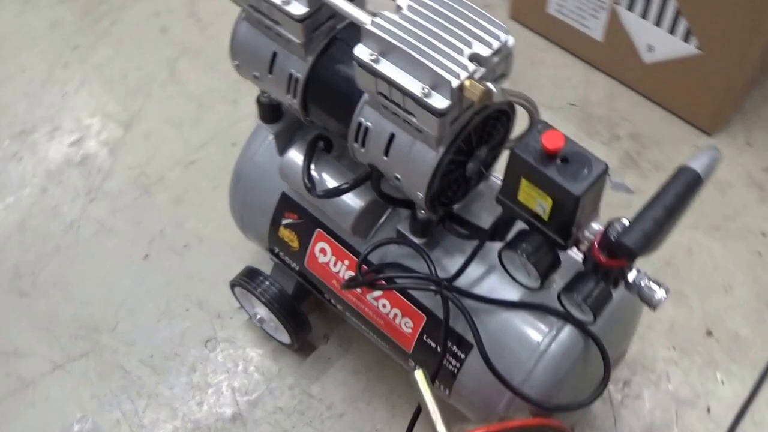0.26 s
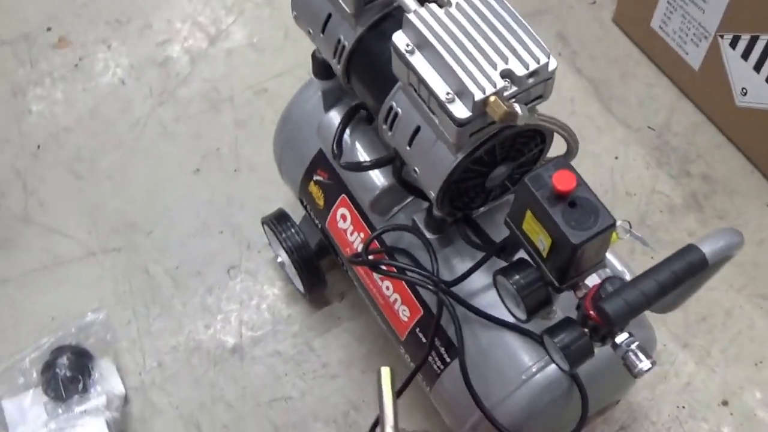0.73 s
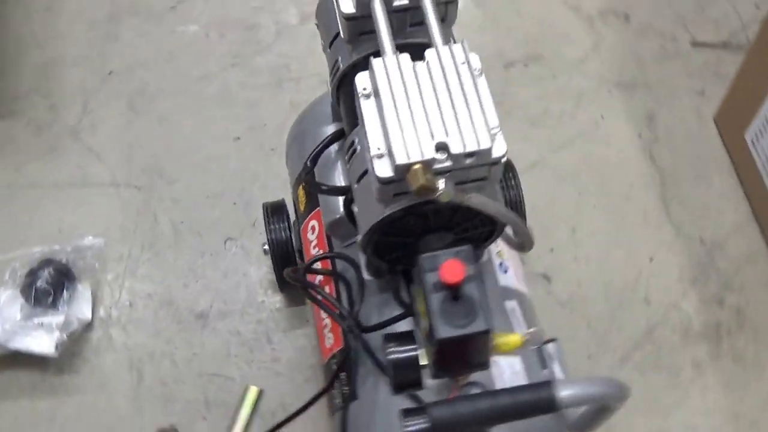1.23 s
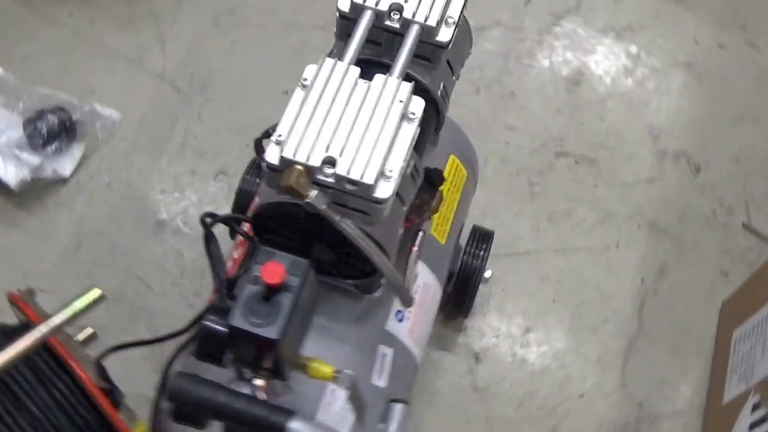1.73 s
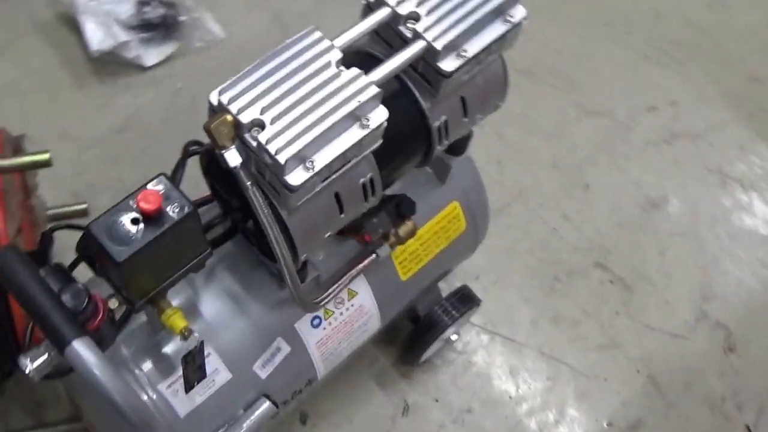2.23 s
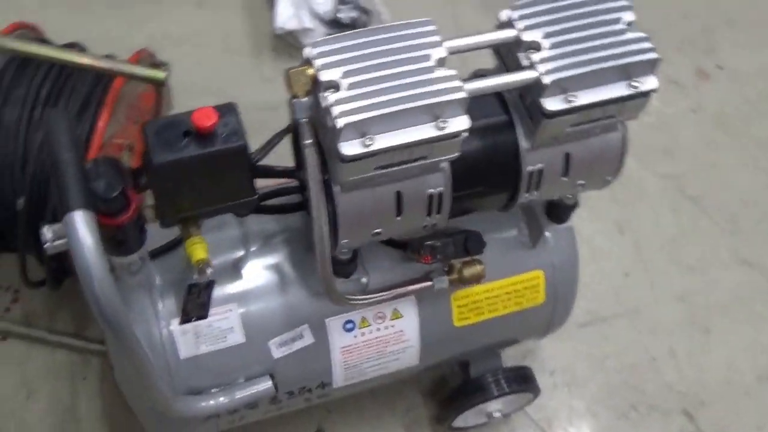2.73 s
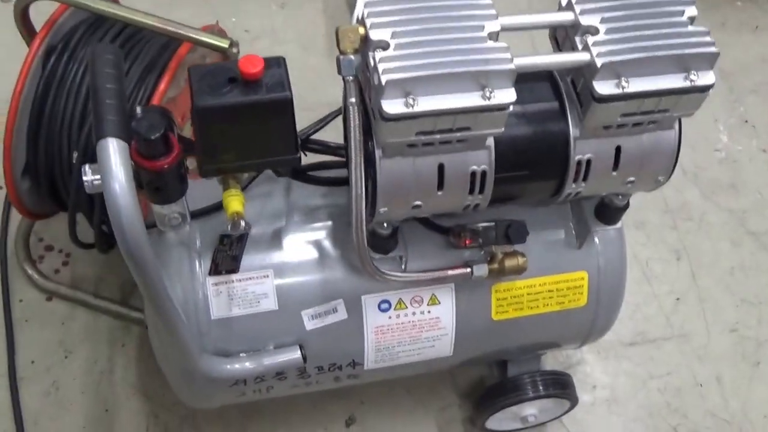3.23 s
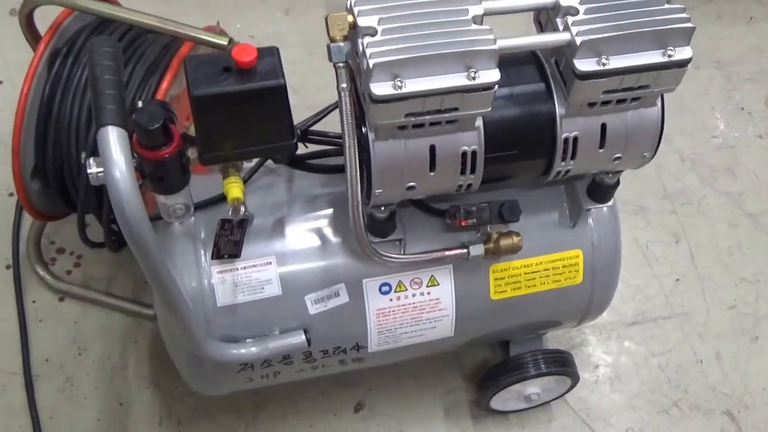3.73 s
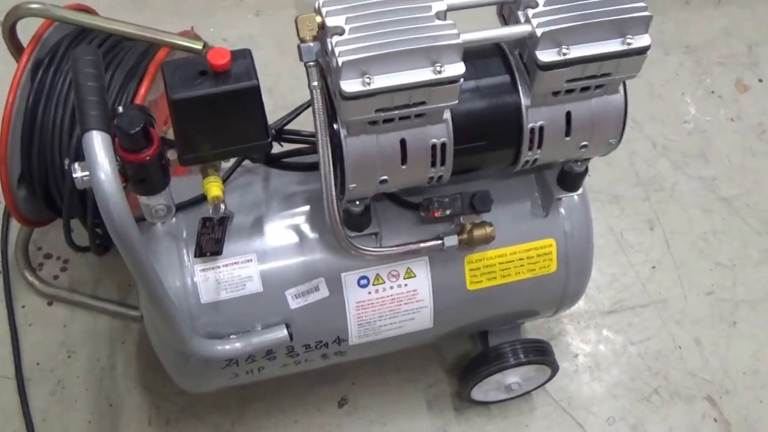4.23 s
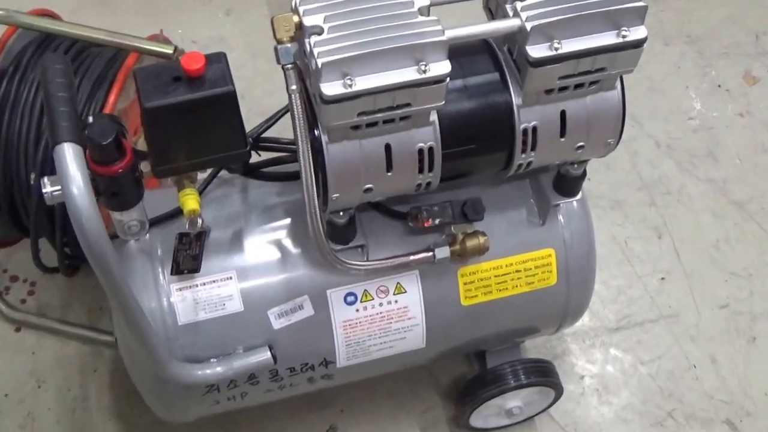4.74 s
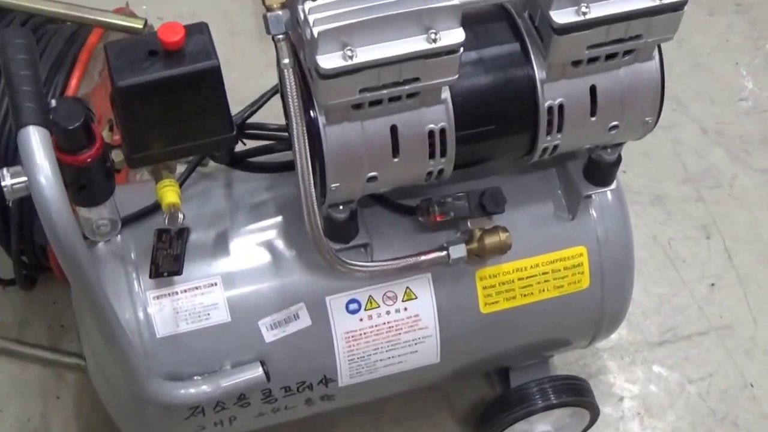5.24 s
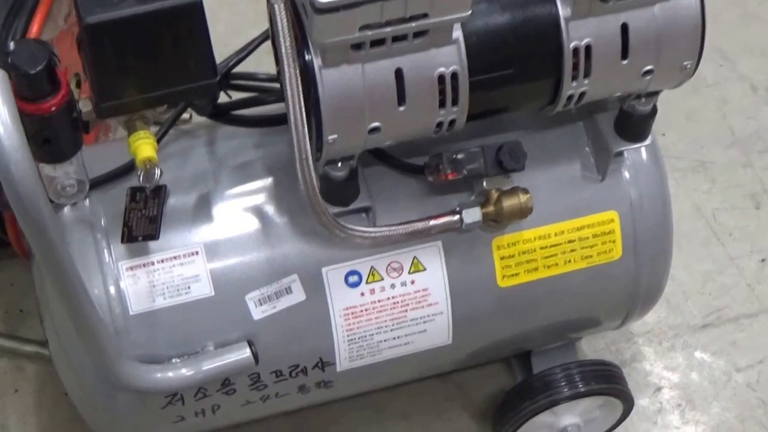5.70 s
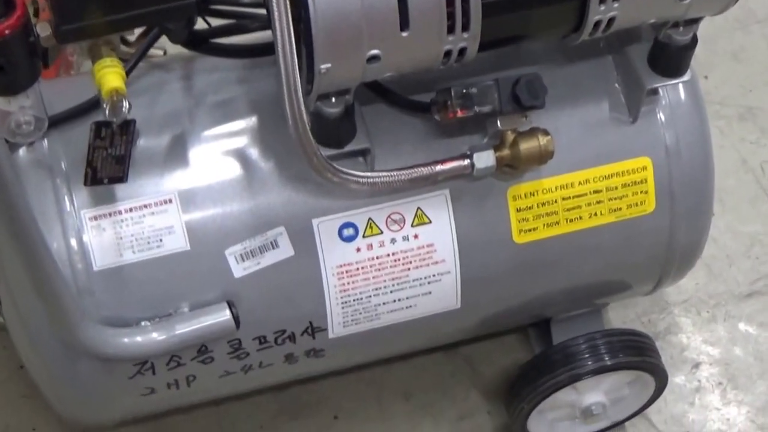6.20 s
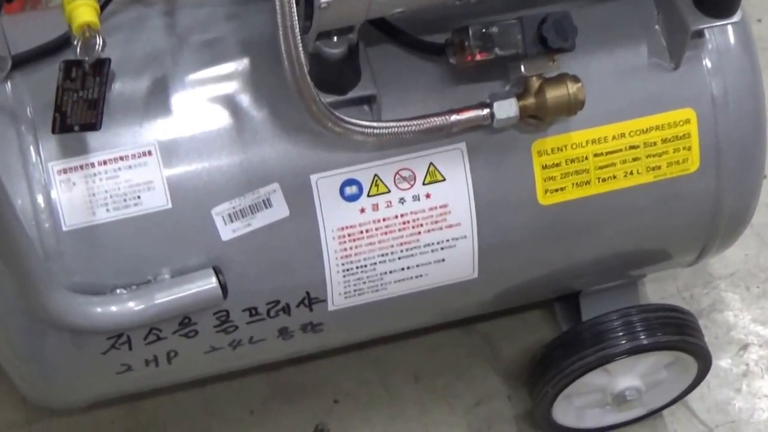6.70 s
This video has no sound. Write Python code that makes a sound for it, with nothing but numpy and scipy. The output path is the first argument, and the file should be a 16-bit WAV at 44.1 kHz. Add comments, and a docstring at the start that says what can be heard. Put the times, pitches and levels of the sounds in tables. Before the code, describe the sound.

Constant rapid chug and drone of a portable compressor, with ringing metal clatter and hissing air, its tone shifting as the listener circles it.

```python
"""Two-piston air compressor

A small compressor runs steadily on a workshop floor while the listening position moves round it.
Crank orders passed through cavity resonances give one low chug a turn, with intake turbulence around it.
Noise bursts after valve slaps excite resonances: heads and fins ring, a reed whistles, air hisses.
Impulses ring a plate at both ends of the stroke, and steady sinusoids make the motor hum."""
import sys
import numpy as np
from scipy import signal
from scipy.fft import rfft, irfft
from scipy.io import wavfile

SR = 44100
rng = np.random.default_rng(int(sys.argv[2]) if len(sys.argv) > 2 else 0)


def transcribe(signal):
    """Save signal, clipped to [-1, 1], as a 16-bit WAV file at the path in sys.argv[1]."""
    frames = np.atleast_2d(signal).T
    limited = np.clip(frames, -1, 1)
    pcm = np.round(limited * 32767).astype(np.int16)
    wavfile.write(sys.argv[1], SR, pcm)


def natural_amplitude(level_db):
    """Convert a level in decibels to a linear amplitude factor, elementwise."""
    exponent = np.asarray(level_db, float) / 20
    return 10 ** exponent


N = 306936

TURNS_PER_S, FIRST_TURN = 28.806, 0.054  # crank speed; crank phase in turns
TAPS = 4096  # length of a resonance response in samples
GRAINS = 1024  # noise points in the pattern repeated each turn
DRAWS = 400  # random values in a slow drift or a series of turns

# Widths of resonances are taken where the amplitude is half that of the peak.
# Places are 0 by the handle, 1 at the corner, 2 at the side, 3 low by the tank.

# Path of the listener. Each row: time in seconds, place 0-3, extra distance in metres.
WALK = [(0.0, 0.04, 0.174), (0.5, 0.0, 0.062), (1.0, 0.38, 0.023), (1.5, 0.88, -0.003), (2.0, 1.09, -0.106),
        (2.5, 1.13, -0.142), (3.0, 1.85, -0.193), (3.6, 2.16, -0.159), (4.4, 2.43, -0.034),
        (5.4, 2.81, 0.012), (6.4, 3.0, 0.116), (6.96, 3.0, 0.13)]
# Air spaces and panels rung once a turn. Each row: moment in the turn 0-1, frequency in Hz, width in Hz,
# then peak level in dB by the handle, at the corner, at the side, by the tank, ahead of the low cut.
CAVITIES = [(0.655, 67.0, 32.0, -41.0, -43.0, -41.0, -40.0),
            (0.527, 181.0, 28.0, -42.0, -41.0, -41.0, -35.0),
            (0.743, 240.0, 14.0, -25.0, -25.0, -30.0, -35.0),
            (0.186, 321.0, 78.0, -25.0, -25.0, -25.0, -29.0),
            (0.246, 415.0, 48.0, -65.0, -55.0, -31.0, -32.0),
            (0.688, 454.0, 371.0, -40.0, -46.0, -54.0, -52.0),
            (0.601, 464.0, 176.0, -30.0, -46.0, -65.0, -65.0),
            (0.996, 529.0, 205.0, -40.0, -50.0, -46.0, -41.0),
            (0.123, 548.0, 33.0, -51.0, -65.0, -33.0, -28.0),
            (0.486, 586.0, 70.0, -29.0, -38.0, -43.0, -47.0),
            (0.36, 609.0, 393.0, -33.0, -44.0, -31.0, -33.0),
            (0.346, 688.0, 207.0, -30.0, -34.0, -28.0, -33.0),
            (0.666, 705.0, 97.0, -36.0, -46.0, -37.0, -37.0),
            (0.103, 735.0, 49.0, -31.0, -36.0, -33.0, -40.0),
            (0.064, 812.0, 32.0, -33.0, -58.0, -37.0, -65.0),
            (0.816, 915.0, 36.0, -65.0, -50.0, -55.0, -32.0),
            (0.352, 924.0, 217.0, -47.0, -49.0, -47.0, -65.0),
            (0.222, 933.0, 12.0, -37.0, -26.0, -65.0, -65.0),
            (0.311, 961.0, 12.0, -40.0, -65.0, -36.0, -65.0),
            (0.259, 989.0, 73.0, -45.0, -48.0, -65.0, -49.0)]
# Spectrum of the intake turbulence. Each row: frequency in Hz, relative density in dB per Hz.
FLUTTER_SPECTRUM = [(30, -41), (120, -10.5), (200, -0.5), (320, -1.5), (500, 4.5), (800, 1.5), (1000, -2.5),
                    (1300, -32), (3000, -74)]
# Steady tones of the motor. Each row: frequency in Hz, rms level in dB ahead of the stereo balance.
HUM_TONES = [(120, -58), (177.5, -51), (240, -46.5), (360.5, -54)]
# Valve plate resonances. Each row: frequency in Hz, width in Hz, relative level in dB.
PLATE_MODES = [(3043, 91, 7), (3500, 240, -0.5)]
# Valve slaps in each turn. Each row: moment in the turn 0-1, then burst power in dB over the steady drive
# of the metalwork, of the whistle, of the hiss, ahead of any exposure factor and chance.
VALVES = [(0, 8.5, -10, -3), (0.245, -12, 13.5, -14), (.36, 4.5, 6, 2), (.49, 5, 13.5, -16),
          (.86, 7, -12, 2.5)]
# Heads, fins and pipes. Each row: frequency in Hz, width in Hz, relative level in dB from the corner,
# relative level in dB from elsewhere.
RINGS = [(1123, 6.7, -15, 1.5), (1476, 16.3, -1, 6), (1746, 197, -4, -3.5), (2091, 51, 6, 0),
         (2294, 63, -6, 1), (2620, 44, -14, -27), (3270, 330, -10, -14), (4017, 120, -4.5, -6.5),
         (4236, 155, -4, -11), (5160, 240, -11.5, -9.5), (6070, 110, -6, -8.5)]
# Metal response between the rings. Each row: frequency in Hz, relative level in dB.
METAL_SPECTRUM = [(700, -76), (1100, -12), (2000, -9), (3800, -12), (4700, -16.5), (5600, -18.5),
                  (6600, -16.5), (7400, -23.5), (9000, -61)]
# Reed valve resonances. Each row: frequency in Hz, width in Hz, relative level in dB.
WHISTLE_MODES = [(7560, 76, -14), (7700, 370, -9.5), (8730, 52, -2.5), (9270, 780, -2.5), (9380, 110, -1.5),
                 (9830, 86, -1)]
# Spectrum of the rushing air. Each row: frequency in Hz, relative density in dB per Hz.
HISS_SPECTRUM = [(6000, -45), (7200, -19), (8300, -17.5), (9000, -17.5), (10200, -13.5), (12500, -11),
                 (14500, -18.5), (15200, -18.5), (15900, -27.5)]
# Air resonances at valves and filters. Each row: frequency in Hz, width in Hz, relative level in dB.
PORTS = [(10720, 67, -2.5), (11500, 190, -8), (12100, 150, -11)]

# Layer levels ahead of the stereo balance. Each row: level in dB by the handle, corner, side, tank.
FLUTTER_BY_PLACE_DB = (-36, -38.5, -40, -36.5)
PLATE_BY_PLACE_DB = (-55, -59, -60, -45.5)
METAL_BY_PLACE_DB = (-33, -37.5, -35, -35)
WHISTLE_BY_PLACE_DB = (-31, -37, -33.5, -34)
HISS_BY_PLACE_DB = (-31.5, -36, -35, -33)
# Left over right for the low sound. Each row: difference in dB by the handle, corner, side, tank.
LEAN_BY_PLACE_DB = (.4, -.4, 0, .2)
# Left over right for the whole machine. Each row: frequency in Hz, difference in dB.
BALANCE_DB = [(50, 2.4), (110, 2.3), (180, .3), (300, -1.2), (700, -.6), (1100, 0), (9000, -.3), (12000, 0)]
# Room sound of opposite sign in the two channels. Each row: frequency in Hz, gain in dB.
SIDE_DB = [(60, -46), (200, -22), (500, -21), (900, -27), (1300, -26), (4500, -26), (6500, -21),
           (8000, -16), (10000, -17), (11300, -25), (12500, -45)]


def read(points, hz):
    """Pitch scale: a spectrum is interpolated on a logarithmic frequency axis."""
    f, value = np.transpose(points)
    return np.interp(np.log(hz + 1), np.log(f + 1), value)


def curve(points):
    """Trajectory: each column after the time is interpolated at every sample."""
    s, *columns = np.transpose(points)
    return [np.interp(np.arange(N) / SR, s, c) for c in columns]


def by_place(place, values):
    """Directivity: values given for the four places are blended linearly between them."""
    return np.interp(place, np.arange(len(values)), values)


def evened(x):
    """Normalisation: the signal is scaled to unit rms."""
    return x / np.sqrt(np.mean(x ** 2) + 1e-20)


def drift(per_s):
    """Slow random modulation: per_s normal values each second are joined by straight lines."""
    return np.interp(np.arange(N) / SR * per_s, np.arange(DRAWS), rng.standard_normal(DRAWS))


def causal(gain):
    """Minimum phase: the phase is the negative Hilbert transform of the log gain."""
    log_gain = np.log(gain + 1e-5)
    both_sides = np.r_[log_gain, log_gain[-2:0:-1]]
    return log_gain - 1j * signal.hilbert(both_sides).imag[:len(gain)]


def colour(x, floor, peaks):
    """Resonance: an excitation is convolved with peaks standing on a broad spectrum."""
    hz = np.fft.rfftfreq(2 * TAPS, 1 / SR)
    power = natural_amplitude(read(floor, hz)) ** 2
    for f, width, db in peaks:
        power = power + natural_amplitude(db) ** 2 / (1 + (2 * (hz - f) / width) ** 2) ** 2
    response = irfft(np.exp(causal(np.sqrt(power))))[:TAPS]
    return signal.oaconvolve(x, response)[:N]


def drive(turns, column, decay_turn, repeat, uneven_db, seen=1):
    """Impact excitation: noise, partly the same each turn, gains a decaying burst at each valve slap."""
    pattern = rng.standard_normal(GRAINS)
    same = evened(np.interp(turns % 1 * GRAINS, np.arange(GRAINS), pattern))
    power = np.ones(N)
    for row in VALVES:
        since = turns - row[0]
        size_db = row[column] + uneven_db * rng.standard_normal(DRAWS)[since.astype(int)]
        power += seen * natural_amplitude(size_db) ** 2 * np.exp(-(since % 1) / decay_turn)
    share = np.clip(repeat, 0, 1)
    fresh = rng.standard_normal(N)
    return np.sqrt(power) * (share * same + np.sqrt(1 - share ** 2) * fresh)


def chug(turns, place, waver_db):
    """Fourier series: cavities rung once a turn add up to a steady sum of crank orders."""
    order = np.arange(1, 41)
    order_hz = order * TURNS_PER_S
    tones = 0
    for moment, hz, width, *db in CAVITIES:
        delay = np.exp(-2j * np.pi * order * moment)
        resonance = 1 / (1 + 2j * (order_hz - hz) / width) ** 2
        tones = tones + np.outer(delay * resonance, natural_amplitude(np.array(db)))
    low_cut_hz = 36  # low cut of the microphone, which thins the slowest order
    tones = tones / (1 + (low_cut_hz / order_hz) ** 6)[:, None]
    out = 0
    for k, tone in zip(order, tones):
        out = out + (by_place(place, tone) * np.exp(2j * np.pi * k * (turns % 1))).real
    return np.sqrt(2) * out * natural_amplitude(waver_db * drift(25))


def flutter(turns, place, swing):
    """Turbulence: intake noise is modulated by the crank, strongest at 0.4 of the turn."""
    gate = 1 + swing * np.cos(2 * np.pi * (turns - 0.4))
    noise = colour(gate * rng.standard_normal(N), FLUTTER_SPECTRUM, [])
    level_db = by_place(place, FLUTTER_BY_PLACE_DB) + 2.0 * drift(6.8)
    return natural_amplitude(level_db) * evened(noise)


def hum():
    """Pure tones: the motor gives steady sinusoids that do not follow the crank."""
    t = np.arange(N) / SR
    return sum(np.sqrt(2) * natural_amplitude(db) * np.sin(2 * np.pi * (hz * t + rng.random())) for hz, db in HUM_TONES)


def plate(turns, place):
    """Impulse response: a valve plate rings at both ends of the stroke, the first knock stronger."""
    knocks = np.diff(np.floor(turns), prepend=1)
    knocks += 0.12 * np.diff(np.floor(turns + 0.5), prepend=1)
    knocks *= natural_amplitude(1.0 * rng.standard_normal(N))  # 1 dB of chance from knock to knock
    ringing = colour(knocks, [(20, -70), (20000, -78)], PLATE_MODES)
    return natural_amplitude(by_place(place, PLATE_BY_PLACE_DB)) * evened(ringing)


def metalwork(turns, place):
    """Forced vibration: pistons and valves shake the heads, and other parts face the moving listener."""
    shake = drive(turns, column=1, decay_turn=0.044, repeat=0.56, uneven_db=1.8, seen=0.45)
    shake *= 1 + 0.18 * np.cos(2 * np.pi * (turns - 0.4))  # the load swings over each turn
    corner = colour(shake, METAL_SPECTRUM, [(hz, width, db) for hz, width, db, _ in RINGS])
    elsewhere = colour(shake, METAL_SPECTRUM, [(hz, width, db) for hz, width, _, db in RINGS])
    at_corner = np.clip(1 - 0.73 * abs(place - 1), 0, 1)
    ringing = evened(at_corner * corner + (1 - at_corner) * elsewhere)
    return natural_amplitude(by_place(place, METAL_BY_PLACE_DB)) * ringing


def whistle(turns, place):
    """Reed resonance: a valve sings from 7 to 10 kHz, its slaps mostly hidden from the handle end."""
    seen = np.clip(1.9 * place - 0.6, 0.1, 1)
    shake = drive(turns, column=2, decay_turn=0.022, repeat=0.15, uneven_db=2.0, seen=seen)
    singing = colour(shake, [(20, -70), (20000, -70)], WHISTLE_MODES)
    return natural_amplitude(by_place(place, WHISTLE_BY_PLACE_DB)) * evened(singing)


def hiss(turns, place):
    """Flow noise: air is drawn through the filters and thrown by the fans, with bursts at the valves."""
    rush = drive(turns, column=3, decay_turn=0.054, repeat=0.12, uneven_db=2.5)
    return natural_amplitude(by_place(place, HISS_BY_PLACE_DB)) * evened(colour(rush, HISS_SPECTRUM, PORTS))


def room_sound(x):
    """Reverberation: a decaying noise response gives the faint part unlike in the two channels."""
    length, decay = 1500, 400  # samples
    tail = rng.standard_normal(length) * np.exp(-np.arange(length) / decay)
    tail = evened(tail) / np.sqrt(length)  # unit energy
    gain = natural_amplitude(read(SIDE_DB, np.fft.rfftfreq(N, 1 / SR)))
    return irfft(rfft(signal.oaconvolve(x, tail)[:N]) * gain, N)


def scene():
    """Superposition: one machine at two close microphones, with a balance by frequency and faint room."""
    place, path_m = curve(WALK)
    turns = 1 + FIRST_TURN + TURNS_PER_S * (np.arange(N) / SR - path_m / 343)  # delay at 343 m/s
    low = chug(turns, place, waver_db=0.49) + flutter(turns, place, swing=0.067)
    rest = hum() + plate(turns, place) + metalwork(turns, place)
    rest += whistle(turns, place) + hiss(turns, place)
    unlike = room_sound(low + rest)
    lean_db = by_place(place, LEAN_BY_PLACE_DB)
    balance_db = read(BALANCE_DB, np.fft.rfftfreq(N, 1 / SR))
    channels = []
    for way in (1, -1):  # left, right
        direct = rest + low * natural_amplitude(way * lean_db / 2)
        balanced = irfft(rfft(direct) * natural_amplitude(way * balance_db / 2), N)
        channels.append(balanced + way * unlike)
    return np.array(channels)


def roll_off(x):
    """The treble ends steeply here."""
    return signal.sosfilt(signal.butter(12, 16980, fs=SR, output="sos"), x)


def record(dry):
    """Band limiting: a linear-phase low-pass filter removes the top of the spectrum."""
    edge_hz = 15780
    edge = signal.firwin(511, edge_hz, window=("kaiser", 9), fs=SR)
    mix = signal.oaconvolve(dry, edge[None], "same")
    return roll_off(mix)


dry = scene()
out = record(dry)
transcribe(out)
```